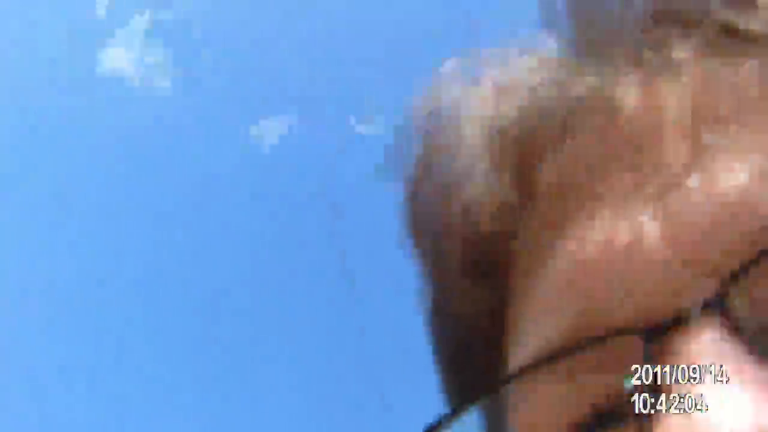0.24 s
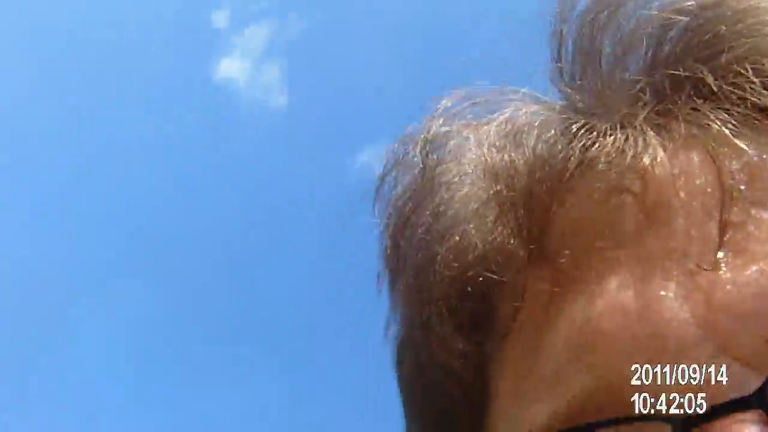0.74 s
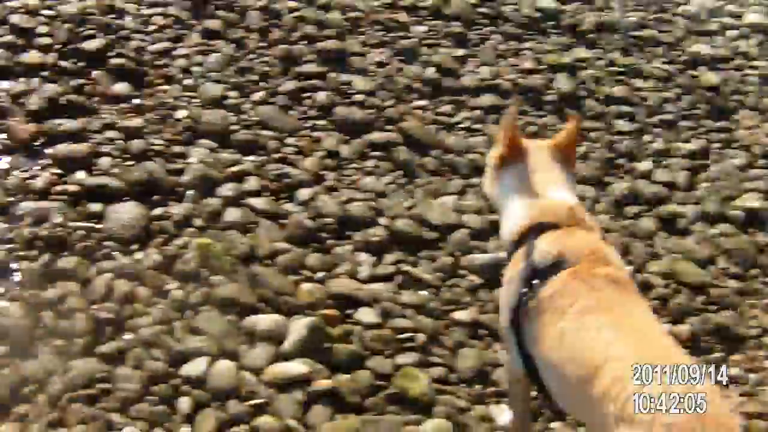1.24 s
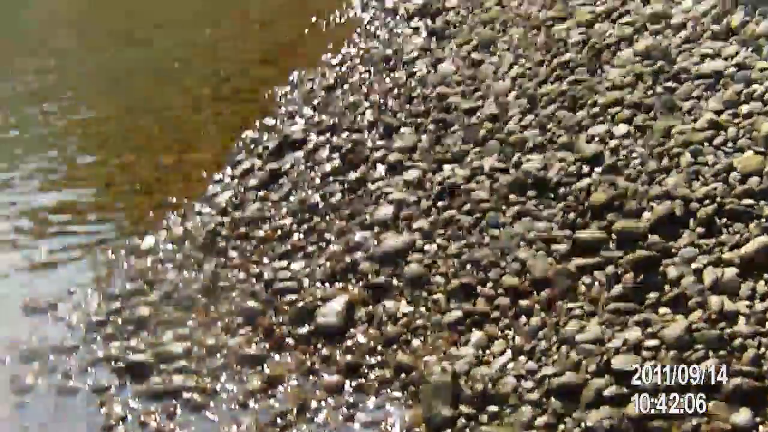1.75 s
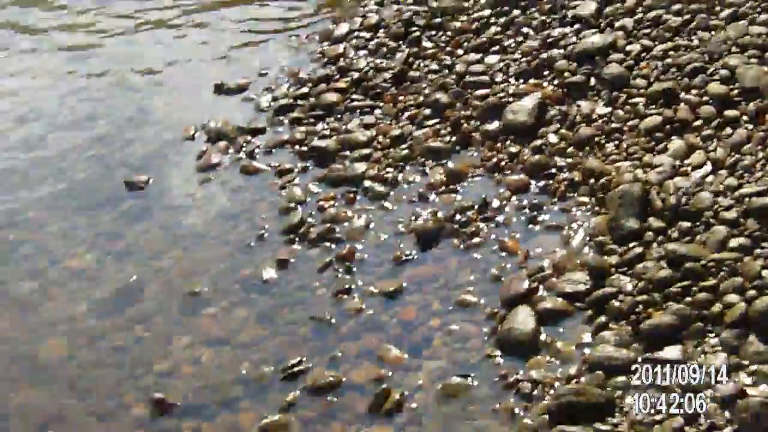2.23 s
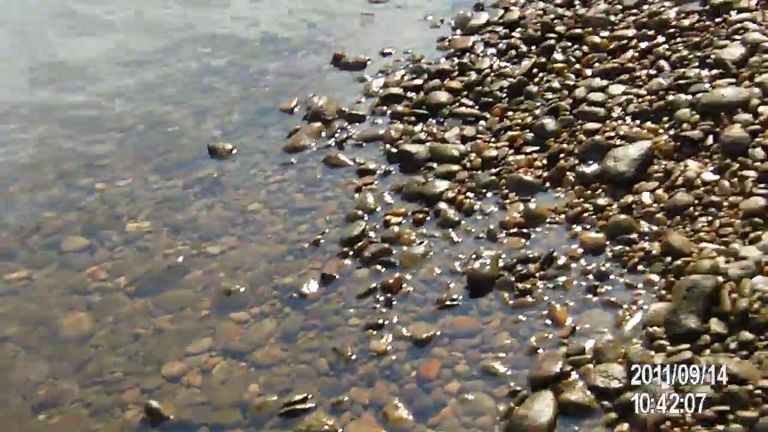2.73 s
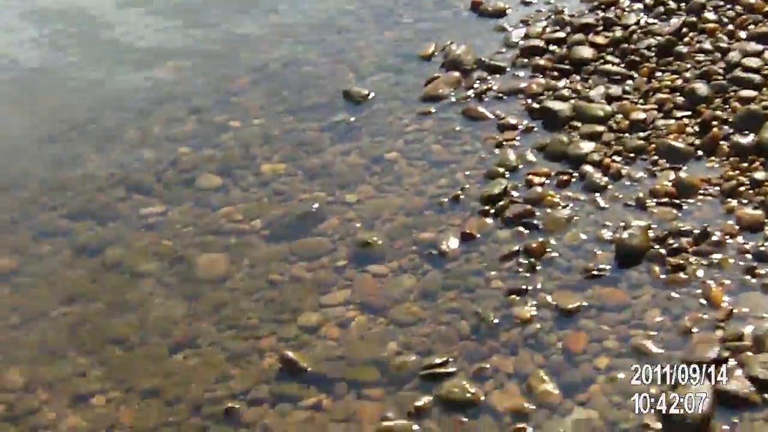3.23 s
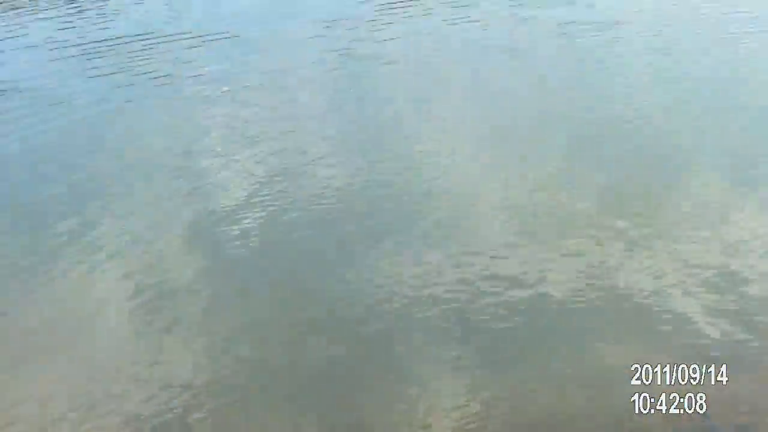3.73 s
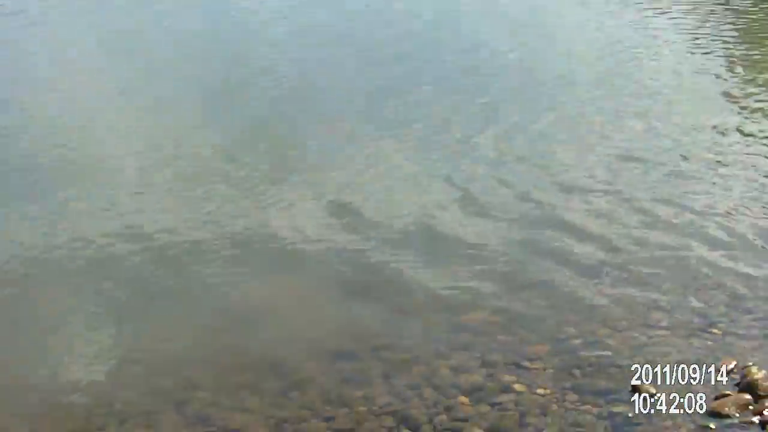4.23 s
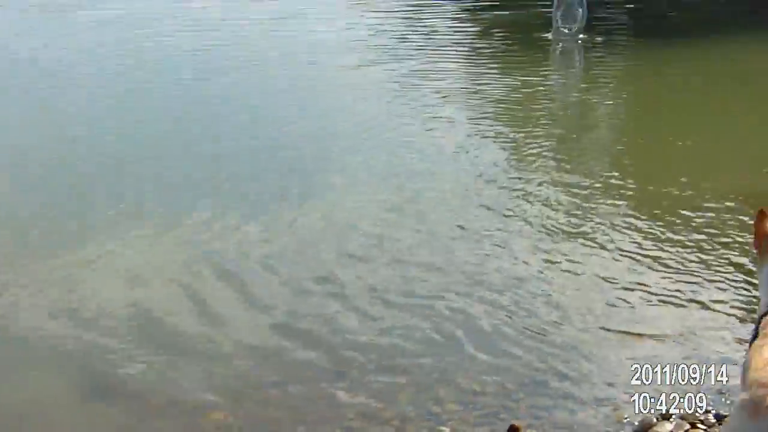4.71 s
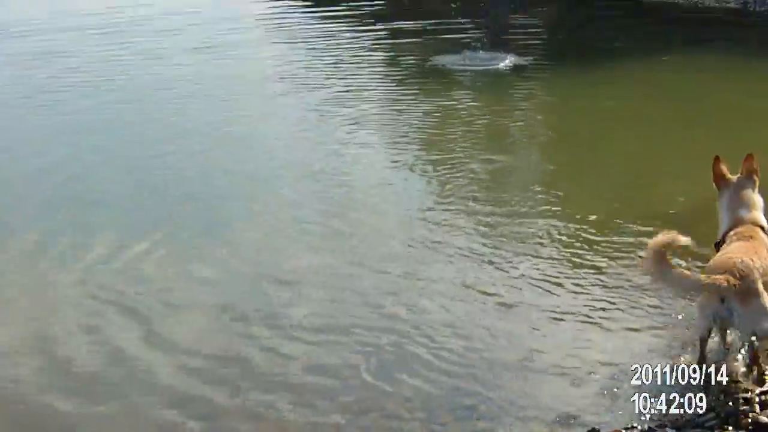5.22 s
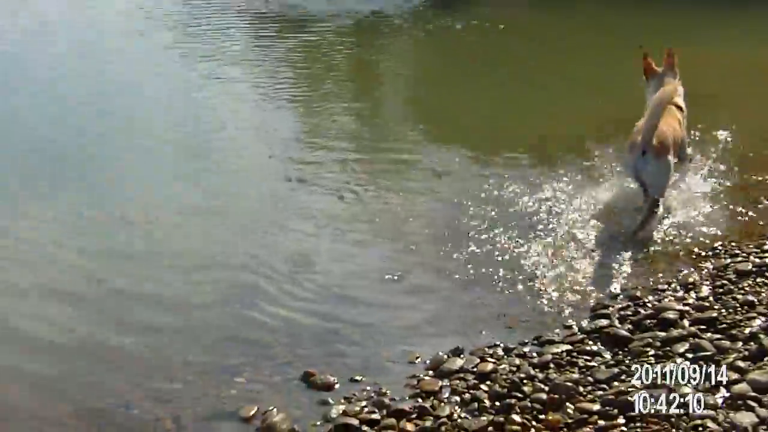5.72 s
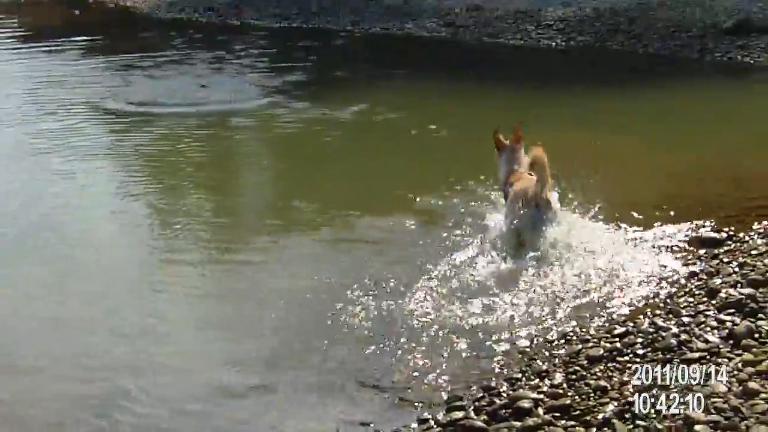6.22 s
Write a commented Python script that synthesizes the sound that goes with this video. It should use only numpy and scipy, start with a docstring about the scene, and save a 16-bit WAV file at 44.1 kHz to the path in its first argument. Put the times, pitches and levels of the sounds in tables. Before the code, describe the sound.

Someone treads over loose river pebbles right beside a hand-held microphone: dense, gritty grinding with sharp clicks and uneven surges. Near the end a thrown stone makes a small, short plop, then a dog plunges through the shallows with quick bursts of spray and bubbly knocks. A faint steady river rush lies behind. Outdoors, dry and close, thin in bass, with the hardest knocks slightly clipped.

```python
"""A dense crackle of grinding river pebbles, close to a hand-held camera: someone treads over loose stones.
The grinding is a swarm of tiny impacts in filtered noise; single knocks are short noise cracks with a faint ring.
A thrown stone plops into the river and a dog splashes after it: short decaying tones, and bursts of spray.
The river is steady band-shaped noise behind; the hardest knocks overload the microphone and are clipped."""
import sys
import numpy as np
from scipy import signal
from scipy.io import wavfile

SR = 44100
rng = np.random.default_rng(int(sys.argv[2]) if len(sys.argv) > 2 else 0)


def wrap_up_sound(samples):
    """Save the sound to the file named by the first command line argument, as 16-bit audio."""
    columns = np.atleast_2d(samples).T
    # keep every value between -1 and 1, then stretch to whole-number steps
    tamed = np.clip(columns, -1, 1)
    steps = np.round(tamed * 32767).astype(np.int16)
    wavfile.write(sys.argv[1], SR, steps)


N = 284886

# A foot loads the pebbles and a patch gives way; levels before the mix gain:
# [t/s, length/s, level/dB, swell over the length/dB, extra bass/dB, extra treble/dB]
SLIDES = [(0.025, 0.185, -21, -1, 6.5, 2.5), (0.235, 0.028, -22.5, 0, 6, 11), (0.3, 0.041, -22, 6, 1, -2),
          (0.476, 0.013, -23.5, -1, 8, 12), (0.79, 0.13, -21.0, -4.5, 7, 2.5),
          (1.015, 0.092, -19.5, 0, 0.5, 5), (1.137, 0.024, -20, -2, -1, 2.0),
          (1.22, 0.085, -23.5, -9.5, -1, 2), (1.335, 0.059, -20.5, 1, -8.5, -3.0),
          (1.435, 0.018, -21.5, -5, -4.0, 9), (1.52, 0.12, -19.0, -3, 3, -2),
          (1.637, 0.1, -15.5, 1.5, 4.5, -7.5), (1.835, 0.071, -23.0, 3, 3, 2.5),
          (2.05, 0.13, -25.5, 0.5, 0.5, 3.5), (2.2, 0.084, -24, -1, 4.5, 2.0),
          (2.275, 0.031, -23.5, 6, 12, -1.0), (2.33, 0.096, -21, -7.5, -3.5, 4.5),
          (2.5, 0.075, -29.5, 1.5, 0, 10.5), (2.68, 0.12, -23.5, -6, 5, -7),
          (2.84, 0.13, -20.5, 7, 1, -3.5), (3.015, 0.12, -24, -10, -6.5, -2),
          (3.255, 0.081, -16.0, 0.5, -5.5, 1.5), (3.49, 0.038, -16.5, 9, -2.5, 0.5),
          (3.55, 0.056, -16.5, -5, -3.5, -4.5), (3.642, 0.022, -13.5, 1.5, -1, -0.5),
          (3.685, 0.1, -24, 3, 1, 1), (3.83, 0.04, -14.5, -3, -4.0, -1), (4.0, 0.037, -23.5, 24, 1, -5),
          (4.18, 0.15, -21.5, 0.5, -2, 0), (4.355, 0.035, -15.0, 11.5, -11, -2),
          (4.505, 0.073, -18.5, 3.5, -4, -4.5), (4.635, 0.11, -21, 9, -8, -7.5),
          (4.85, 0.055, -20, 3.5, -12, 1), (5.03, 0.022, -24.5, 3, -14, 0)]
SLIDE_ATTACK_S, SLIDE_RELEASE_S = 0.0076, 0.0076
# Disturbed stones go on settling between the slides: [t/s, level/dB]
SETTLING = [(0, -31), (.28, -46), (.34, -26), (.54, -32.5), (.65, -26), (.76, -35), (.96, -26.5),
            (1.19, -37.5), (1.3, -26.5), (1.8, -30), (2.02, -36), (2.27, -35.5), (2.47, -33.5),
            (2.81, -29.5), (2.92, -30), (3.0, -31.5), (3.17, -46), (3.25, -25.5), (3.44, -35),
            (4.15, -28.5), (4.45, -26.5), (5.0, -29), (5.2, -64)]
SETTLING_DEPTH_DB, SETTLING_SPARKLE_DB = 4, 0.5
# Colour of the grinding, only its shape counts: [f/Hz, density/(dB per Hz)]
GRAVEL_SPECTRUM = [(71, -73), (120, -48), (360, -22.5), (450, -15.5), (995, -9), (1100, -8), (1790, -0.5),
                   (1990, -1), (2240, -1), (2920, 2), (3170, -1), (6460, -2.5), (11200, -6), (15500, -13)]
# Single knocks at set times, hard and faint, pebble on pebble or a slap on the water;
# levels before the common knock gain:
# [t/s, level over 5 ms/dB, f/Hz, half width/octaves, decay time constant/s]
SET_KNOCKS = [(0.062, -4.5, 5120, 0.73, 0.00096), (0.081, -5.5, 6900, .7, 0.0019),
              (0.1022, -12, 7340, .6, 0.0018), (0.142, -5.5, 6200, 0.48, 0.0025),
              (0.2, -5, 9400, .6, 0.0038), (0.2709, -7, 9900, .4, .0011), (0.3222, -6.5, 7740, 1.1, 0.0017),
              (0.33, -2, 8600, 0.21, 0.0029), (0.4404, -7, 8260, 0.11, .0007),
              (0.4837, -8, 9200, 0.44, 0.00071), (0.525, -4, 6650, 0.16, 0.0016),
              (0.5533, -2.5, 6890, 0.99, 0.0016), (0.5635, -10, 3110, 0.52, 0.0012),
              (0.6378, -15, 6800, 0.19, 0.00056), (0.6957, -16, 3300, 1.2, .0015),
              (0.7194, -3, 5060, 1.2, .0019), (0.736, -9, 4440, 1.5, 0.0012), (1.103, -8, 6600, 2, 0.0013),
              (1.1502, -2.5, 7900, 0.72, 0.0066), (1.217, -8, 10600, .3, 0.0012),
              (1.2692, -8.5, 2120, 0.23, 0.0017), (1.3553, -4.5, 7040, 0.39, 0.00045),
              (1.438, -4.5, 5770, 0.78, 0.0024), (1.52, -7, 3330, 0.39, 0.00087),
              (1.597, -7, 5700, 0.2, 0.0019), (1.6481, -6, 2520, 1.6, 0.0095),
              (1.6812, -6.5, 3020, 1, 0.0039), (1.9876, -14, 7950, 1.8, 0.00086),
              (2.0064, -11.5, 6640, 0.5, 0.0015), (2.048, -2, 6930, 0.57, 0.0013),
              (2.109, -4, 10600, 1.6, .0013), (2.2002, -6.5, 4900, 1.3, 0.0018),
              (2.2168, -1, 8180, 0.21, 0.0013), (2.3073, -6.5, 5660, .5, .0008),
              (2.4853, -6.5, 4000, 0.38, 0.00041), (2.8126, -5, 4500, .25, 0.0015),
              (2.974, -8, 6450, 0.64, 0.0011), (3.0465, -5, 10000, 0.073, 0.00083),
              (3.1206, -12, 5300, 1.2, 0.001), (3.209, -5, 7360, 0.36, 0.0011),
              (3.4108, -9, 4170, 0.82, 0.00055), (3.5981, -9, 6200, .25, 0.00056),
              (3.6531, -12, 3660, 0.5, .0022), (3.6946, -5.5, 3200, 0.56, 0.00078),
              (3.7489, -10, 3500, 0.32, 0.0021), (3.7927, -1, 5600, 0.75, 0.0024),
              (3.925, -4.5, 3800, 0.66, 0.0017), (3.9465, -3.5, 4070, 0.23, 0.001),
              (4.0336, -4, 7900, 1.55, 0.0025), (4.042, -0.5, 3790, 0.27, 0.0021),
              (4.0706, -8.5, 4740, 0.89, 0.00086), (4.1063, -11.5, 4400, 0.35, 0.0028),
              (4.1324, -10.5, 4160, .5, 0.00072), (4.3011, -6.5, 3550, .5, .0013),
              (4.3458, -9.5, 3200, .1, .005), (4.3859, -3, 6240, 0.79, 0.0029),
              (4.5198, -4.5, 7700, 1.2, .0028), (4.5793, -2.5, 10600, 0.64, 0.0018),
              (4.637, -6.5, 4120, .22, 0.006), (4.6831, -5, 3630, 0.47, 0.0016),
              (4.7957, -13.5, 2500, 1.35, 0.002), (4.8742, -6, 4470, 1.53, 0.0016),
              (4.8857, -7, 2800, 0.37, 0.0015), (4.9634, -14, 6000, 0.43, 0.00075),
              (4.9805, -5.5, 7400, 0.93, 0.00055), (5.0109, -11, 2840, 0.12, 0.0028),
              (5.0212, -10, 3260, .6, 0.00051), (5.041, -5.5, 10400, 0.36, 0.00085),
              (5.0517, -8.5, 9800, 0.42, 0.00074), (5.1313, -10.5, 9200, 0.43, 0.0014),
              (5.2225, -9.5, 9300, 0.65, 0.0015), (5.2287, -9, 8950, 0.9, .0016),
              (5.2757, -6.5, 3000, 1.26, 0.0036), (5.3005, -9, 5800, 1.3, .0012),
              (5.5616, -9, 3360, 0.55, 0.0022), (5.5843, -8, 2340, 0.14, 0.0027)]
RESONANCE_Q, RESONANCE_DB = 9, 8
# Lesser knocks come at a steady rate with jittered times; their level follows the grinding;
# levels before the common knock gain
KNOCKS_PER_S, KNOCK_OVER_DB, KNOCK_SPREAD_DB = 24, 8.5, 2.5
KNOCK_FOLLOWS, TYPICAL_GRIND_DB = 0.72, -23  # share of the grinding's swing about its typical level
KNOCK_TOP_DB = -12
KNOCK_HZ, KNOCK_SPREAD_OCT, KNOCK_WIDTH_OCT, KNOCK_DECAY_S = 6200, 0.554, 0.51, 0.00092
# Upper limits of ping level above the grinding and churning level curves
CLINK_OVER_DB, BUBBLE_OVER_DB = 8.5, 1.5
# How far the camera points up: [t/s, share 0-1]
UPTURN = [(0, 0.4), (.25, 1), (1.0, 0.5), (1.25, 0)]
# Microphone colour while the camera points up, away from the ground: [f/Hz, width/Hz, level/dB]
UPTURNED_PEAKS = [(430, 100, -2), (1840, 90, 1.5), (3230, 140, -4), (3800, 370, 4), (5530, 900, -2),
                  (6540, 330, 3), (7500, 470, 6), (8480, 400, 5.5), (14800, 4600, -4.5)]
# The river's steady rush, only its shape counts: [f/Hz, density/(dB per Hz)]
RIVER_SPECTRUM = [(30, 3), (70, 1), (130, -15.5), (230, -6), (350, -3), (800, 2.5), (2500, 1), (7000, -6.5),
                  (15000, -2)]
# Short decaying tones: a wet stone knocking at 1.99 s, then air pockets ringing in the water,
# the thrown stone landing at 4.79 s; levels before the plop gain:
# [t/s, level/dB, f/Hz, time to fall 60 dB/s]
WET_TONES = [(1.992, -7, 1004, 0.019), (4.794, -9.5, 810, 0.047), (4.794, -17.5, 285, 0.037),
             (4.824, -14.5, 880, 0.037), (5.088, -19, 885, .04), (5.225, -9.5, 875, 0.021),
             (5.335, -27, 540, .05), (5.378, -2.5, 860, 0.012), (5.618, -31, 383, .2),
             (5.635, -8, 850, 0.026), (5.823, -9.5, 896, 0.05), (5.824, -30, 490, 0.15),
             (5.893, -1, 840, 0.023), (5.922, -15, 810, 0.021), (6.124, -25.5, 378, .075),
             (6.188, -5, 950, 0.031), (6.191, -18.5, 400, 0.029), (6.285, -35, 230, 0.042),
             (6.302, -28, 415, 0.092)]
# The dog's legs plunge into the shallows; levels before the mix gain and the resonances:
# [t/s, length/s, level/dB, swell over the length/dB, extra bass/dB, extra treble/dB]
SPLASHES = [(5.088, 0.07, -18.5, -4, -4, -2.5), (5.24, 0.043, -21, 12, -5, -3),
            (5.325, 0.063, -24.5, 2, 4.5, -0.5), (5.48, 0.053, -26.5, 2, -9, -2),
            (5.56, 0.078, -21, 3, -5.5, -1), (5.8, 0.1, -30.5, -3, 10, -5),
            (5.885, 0.041, -22.5, 0, 4, 2.5), (6.07, 0.13, -24, 4, 2.5, 0.5),
            (6.29, 0.27, -30, 1, 16, -5.5)]
SPLASH_ATTACK_S, SPLASH_RELEASE_S = 0.013, 0.018
# Once the dog is in, thrown-up water keeps falling back
WADE_START_S, WADE_BUILD_S = 5.12, 0.031
FALLBACK_DB, FALLBACK_DEPTH_DB, FALLBACK_SPARKLE_DB = -28, -7.5, 3.5
# Colour of the splashing, only its shape counts: [f/Hz, density/(dB per Hz)]
WATER_SPECTRUM = [(71, -73), (120, -42), (282, -35), (383, -14.5), (575, -22), (676, -4), (917, -3.5),
                  (1650, -2), (2290, -4), (3810, -7.5), (5270, -7), (7610, -16.5), (9910, -0.5),
                  (14000, -16), (15500, -15)]
# Resonances and hollows of the splashing: [f/Hz, width/Hz, level/dB]
SPLASH_PEAKS = [(890, 200, 3), (1620, 180, -3.5), (2240, 540, 4.5), (3300, 130, 2.5), (6380, 390, 3.5),
                (9100, 2800, 1.5), (11700, 2100, -6), (14600, 1700, 5.5)]
# Likeness of the two microphone ports: [f/Hz, correlation 0-1]
LIKENESS = [(60, .7), (300, .94), (700, .96), (3000, .94), (5000, .86), (8000, .68), (14000, .35)]
# Balance of the two ports, left over right: [f/Hz, level/dB]
BALANCE = [(60, 1), (200, 9.5), (400, 7.3), (700, 7), (1300, 4.5), (2400, 1), (8000, 0.5), (15000, 0)]
# Microphone: bass loss before and after it overloads, treble notch, top limit, delay of the left port
BASS_CUT_HZ, COUPLING_HZ = 306, 70
NOTCH_HZ, NOTCH_WIDTH_HZ, NOTCH_DB = 7850, 99, -18.5
CUTOFF_HZ, PORT_LAG_S = 15900, 6.5e-6
# Band edges of the crackle [f/Hz]
EDGES = np.geomspace(122, 16000, 21)


def from_db(db):
    """Logarithmic level: decibels to amplitude gain."""
    return np.exp(np.asarray(db) * (np.log(10) / 20))


def rms_one(x):
    """Normalisation: scale to a root mean square of 1."""
    return x / np.sqrt(np.mean(x ** 2) + 1e-20)


def in_time(rows):
    """Linear interpolation: each column of a curve, sample by sample."""
    s, *columns = np.transpose(rows)
    return [np.interp(np.arange(N) / SR, s, c) for c in columns]


def at_hz(points, hz):
    """Logarithmic pitch scale: read a spectrum on a log-frequency axis."""
    points = np.array(points)
    return np.interp(np.log(hz), np.log(points[:, 0]), points[:, 1])


def band(x, low, high, order=2):
    """Band-limiting: Butterworth band-pass."""
    limits = [max(low, 10), min(high, .45 * SR)]
    return signal.sosfilt(signal.butter(order, limits, "band", fs=SR, output="sos"), x + 1e-18)


def drift(rate):
    """Random modulation: joined Gaussian values, about `rate` a second, scaled to rms 1."""
    step = min(rate / SR, 1 / 20)
    values = rng.standard_normal(N // 20 + 2)
    return rms_one(np.interp(np.arange(N) * step, np.arange(N // 20 + 2), values))


def stereo(mid, side, hz, pan_db):
    """Interchannel coherence: the likeness of the two ports depends on frequency."""
    alike = np.clip(at_hz(LIKENESS, hz), 0, .99)
    sides = np.array([[1], [-1]])
    common = np.sqrt((1 + alike) / 2) * mid
    opposed = np.sqrt((1 - alike) / 2) * side * sides
    return (common + opposed) * from_db(sides * pan_db / 2)


def add(out, s, sound):
    """Superposition: mix a short stereo sound in at time s."""
    i = max(round(s * SR), 0)
    out[:, i:i + sound.shape[1]] += sound[:, :N - i]


def coloured(x, peaks):
    """Resonance: a chain of second-order peaks and hollows."""
    for hz, width_hz, db in peaks:
        w, a = 2 * np.pi * hz / SR, from_db(db / 2)
        k = np.tan(np.pi * width_hz / SR)
        zeros = [1 + k * a, -2 * np.cos(w), 1 - k * a]
        poles = [1 + k / a, -2 * np.cos(w), 1 - k / a]
        x = signal.lfilter(zeros, poles, x + 1e-18)
    return x


def bursts(rows, attack_s, release_s, bed_db, bed_depth_db, bed_sparkle_db):
    """Power addition: bursts over a quiet bed; gives level and power-weighted depth and sparkle, all in dB."""
    t = np.arange(N) / SR
    power = from_db(bed_db) ** 2 + 1e-14
    depth, sparkle = power * bed_depth_db, power * bed_sparkle_db
    for s, length, level_db, swell_db, depth_db, sparkle_db in rows:
        near = slice(max(int(s * SR) - SR // 5, 0), int((s + length) * SR) + SR // 3)
        age = t[near] - s
        # exponential rise before the burst and fall after it
        edges = np.exp(np.minimum(age, 0) / attack_s - np.maximum(age - length, 0) / release_s)
        swell = swell_db * (np.clip(age / length, 0, 1) - .5)
        burst = (edges * from_db(level_db + swell)) ** 2
        power[near] += burst
        depth[near] += burst * depth_db
        sparkle[near] += burst * sparkle_db
    return 10 * np.log10(power), depth / power, sparkle / power


def crackle(motion, spectrum, per_s, size_db, clump_db, clump_rate, width_oct, hiss, patchy_db, scatter_s):
    """Shot noise: tiny impacts, each of its own size and pitch, over the hiss of countless smaller ones."""
    level_db, depth_db, sparkle_db = motion
    centres = np.sqrt(EDGES[1:] * EDGES[:-1])
    shares = from_db(at_hz(spectrum, centres)) * np.sqrt(np.diff(EDGES))
    shares /= np.linalg.norm(shares)
    # impacts swell together in little avalanches
    surge = rms_one(from_db(clump_db * np.clip(drift(clump_rate), -2, 2)))
    at = np.flatnonzero(rng.random(N) < per_s / SR)
    size = from_db(size_db * np.minimum(rng.exponential(1, N)[at], 3))
    pitch = np.log2(rng.uniform(np.sqrt(150), np.sqrt(15000), N)[at] ** 2)  # octaves
    out, noises = np.zeros((2, N)), rng.standard_normal((3, 2, N))
    for k, (low, high, hz, share) in enumerate(zip(EDGES, EDGES[1:], centres, shares)):
        reach = size / (1 + ((np.log2(hz) - pitch) / width_oct) ** 2)
        touches = np.zeros(N)
        touches[at] = reach ** 2
        # each impact is scattered for a moment between the surfaces around it
        power = signal.lfilter([1], [1, -np.exp(-1 / (scatter_s * SR))], touches + 1e-12)
        envelope = np.sqrt(power / power.mean() + hiss ** 2)
        mid, side = band(noises[k % len(noises)] * envelope, low, high)
        deep = np.clip(np.log2(2400 / hz), 0, 1)
        bright = np.clip(np.log2(hz / 4800), 0, 1)
        gain = share * from_db(deep * depth_db + bright * sparkle_db + patchy_db * drift(45))
        out += gain * stereo(rms_one(mid), rms_one(side), hz, at_hz(BALANCE, hz))
    return out * surge * from_db(level_db)


def pings(level_db, start_s, end_s, low_hz, high_hz, cycles, rise, gain_db, spread_db, count):
    """Damped oscillation: brief tones at random pitches follow a level, as clinking stones or rising bubbles."""
    out, t = np.zeros((2, N)), np.arange(SR // 25) / SR
    for k, (when, size, strength, place) in enumerate(rng.random((count, 4))):
        s = np.interp(k + when, [0, count], [start_s, end_s])
        hz = low_hz * (high_hz / low_hz) ** size
        age = t * hz / cycles  # 1 when the tone has fallen by 60 dB
        wave = np.sin(2 * np.pi * hz * t * (1 + rise * np.minimum(age, 2)))
        tone = wave * from_db(-60 * age) * (1 - np.exp(-t * hz))
        pan_db = at_hz(BALANCE, hz) + 6 * (place - .5)
        peak_db = level_db[np.clip(int(s * SR), 0, N - 1)] + gain_db - spread_db * strength
        add(out, s, tone * from_db(peak_db + np.array([[pan_db], [-pan_db]]) / 2))
    return out


def lesser_knocks(grind_db):
    """Level-following excitation: knock rows at a steady, jittered rate, harder when the grinding is harder."""
    rows = []
    for k in range(int(KNOCKS_PER_S * WADE_START_S)):
        late, strength, pitch, width, decay = np.clip(rng.standard_normal(5), -2, 2)
        s = abs(k + late / 2) / KNOCKS_PER_S
        swing_db = grind_db[min(int(s * SR), N - 1)] - TYPICAL_GRIND_DB
        level_db = TYPICAL_GRIND_DB + KNOCK_FOLLOWS * swing_db + KNOCK_OVER_DB + KNOCK_SPREAD_DB * strength
        hz = min(KNOCK_HZ * 2 ** (KNOCK_SPREAD_OCT * pitch), 12000)
        half_width = KNOCK_WIDTH_OCT * 2 ** (width / 2)
        rows.append((s, min(level_db, KNOCK_TOP_DB), hz, half_width, KNOCK_DECAY_S * 2 ** (decay / 2)))
    return rows


def clacks(rows, ring_db, scatter_db, scatter_s, bounce_db, fade_in, gain_db, pan_spread_db):
    """Impact and scattering: a short fade-in, a crack, one bounce, a faint ring at the knock's pitch, a tail."""
    out, t = np.zeros((2, N)), np.arange(-SR // 200, SR // 25) / SR
    after = np.maximum(t, 0)
    stone_range = signal.butter(2, [790, 15500], "band", fs=SR, output="sos")
    for s, level_db, hz, width, decay in rows:
        pan_db = at_hz(BALANCE, hz) + pan_spread_db * rng.standard_normal()
        width, decay = np.clip(width, .1, 1.6), max(decay, .0003)
        lag, white = rng.uniform(1, 3.2) * decay, rng.standard_normal((2, len(t)))
        # each knock fades in briefly, in proportion to its decay
        onset = np.exp(np.minimum(t, 0) / (fade_in * decay))
        bounce = from_db(bounce_db) * (t > lag) * np.exp(-abs(t - lag) / decay)
        contact = np.exp(-after / decay) + bounce
        scatter = from_db(scatter_db) * np.exp(-after / scatter_s)
        crack = band(white * onset * (contact + scatter), hz / 2 ** width, hz * 2 ** width, order=1)
        ring = np.sin(2 * np.pi * hz * after) * np.exp(-after / decay)
        # three random resonances vary each knock's colour
        resonant_hz = np.minimum(hz * 2 ** rng.uniform(-.4 - width, .4 + width, size=3), 14000)
        resonances = [(f, f / RESONANCE_Q, RESONANCE_DB) for f in resonant_hz]
        mid, side = coloured(signal.sosfilt(stone_range, crack), resonances)
        rung = rms_one(mid) + from_db(ring_db) / width * rms_one(ring)
        knock = stereo(rung, rms_one(side), hz, pan_db)
        # the level holds the knock's whole energy as if spread over 5 ms
        add(out, s + t[0], from_db(level_db + gain_db) * rms_one(knock) * np.sqrt(.005 * SR / len(t)))
    return out


def pebbles():
    """Granular friction: grinding, clinks and knocks underfoot, coloured while the camera points up."""
    settling_db = in_time(SETTLING)[0]
    grind = bursts(SLIDES, SLIDE_ATTACK_S, SLIDE_RELEASE_S, settling_db, SETTLING_DEPTH_DB, SETTLING_SPARKLE_DB)
    gravel = crackle(grind, GRAVEL_SPECTRUM, per_s=1100, size_db=3.0, clump_db=1.5, clump_rate=160,
                     width_oct=0.81, hiss=0.51, patchy_db=1.56, scatter_s=0.0013)
    clinks = pings(grind[0], 0, WADE_START_S, low_hz=2200, high_hz=11500, cycles=55, rise=0,
                   gain_db=CLINK_OVER_DB, spread_db=16, count=420)
    knocks = clacks(list(SET_KNOCKS) + lesser_knocks(grind[0]), ring_db=-35.5, scatter_db=-28.5,
                    scatter_s=0.012, bounce_db=-6.0, fade_in=0.5, gain_db=-5.0, pan_spread_db=3.0)
    stones = from_db(-1.65) * gravel + clinks + knocks
    upturn = np.clip(in_time(UPTURN)[0], 0, 1)
    return upturn * coloured(stones, UPTURNED_PEAKS) + (1 - upturn) * stones


def river(level_db):
    """Stationary broadband noise: smooth, distant running water, shaped band by band."""
    out, edges = 0, np.geomspace(20, 16000, 11)
    for low, high in zip(edges, edges[1:]):
        hz = np.sqrt(low * high)
        mid, side = band(rng.standard_normal((2, N)), low, high, order=3)
        out = out + from_db(at_hz(RIVER_SPECTRUM, hz)) * stereo(mid, side, hz, at_hz(BALANCE, hz))
    return from_db(level_db) * rms_one(out)


def plops(rise, swell_s, pan_db, gain_db):
    """Damped resonance: a wet knock, then air pockets; each tone swells, decays and rises a little in pitch."""
    out, t = np.zeros((2, N)), np.arange(SR // 5) / SR
    for s, peak_db, hz, t60 in WET_TONES:
        tone = np.sin(2 * np.pi * hz * t * (1 + rise * t / t60)) * (1 - np.exp(-t / swell_s))
        decaying = tone * from_db(peak_db + gain_db - 60 * t / t60)
        add(out, s, decaying * from_db([[pan_db / 2], [-pan_db / 2]]))
    return out


def wading():
    """Spray and entrained air: each plunge throws drops and leaves bubbles; water patters back between."""
    before_start = np.minimum(np.arange(N) / SR - WADE_START_S, 0)
    # exponential build-up to the steady patter, as dB
    fallback_db = FALLBACK_DB + 20 * np.log10(np.e) * before_start / WADE_BUILD_S
    churn = bursts(SPLASHES, SPLASH_ATTACK_S, SPLASH_RELEASE_S,
                   fallback_db, FALLBACK_DEPTH_DB, FALLBACK_SPARKLE_DB)
    spray = crackle(churn, WATER_SPECTRUM, per_s=670, size_db=3.5, clump_db=1.5, clump_rate=120,
                    width_oct=1.0, hiss=0.94, patchy_db=2.0, scatter_s=0.00096)
    bubbles = pings(churn[0], WADE_START_S, N / SR, low_hz=900, high_hz=6000, cycles=45, rise=.06,
                    gain_db=BUBBLE_OVER_DB, spread_db=16, count=260)
    return coloured(from_db(-1.0) * spray + bubbles, SPLASH_PEAKS)


def thinned(x, hz):
    """First-order high-pass: a gentle bass cut."""
    return signal.sosfilt(signal.butter(1, hz, "high", fs=SR, output="sos"), x)


def scene():
    """Superposition: stones, the dog, the plops and the river behind them."""
    stones_and_dog = pebbles() + wading()
    return stones_and_dog + plops(rise=0.025, swell_s=0.0018, pan_db=8.0, gain_db=-4) + river(level_db=-43.5)


def record(dry):
    """Overload: the microphone thins the bass, clips, notches the treble and cuts the top; its left port lags."""
    top = .92
    # an all-pass filter delays the left port by a fraction of a sample
    slip = (1 - PORT_LAG_S * SR) / (1 + PORT_LAG_S * SR)
    ports = np.array([signal.lfilter([slip, 1], [1, slip], dry[0]), dry[1]])
    clipped = np.clip(thinned(ports, BASS_CUT_HZ), -top, top)
    notched = coloured(thinned(clipped, COUPLING_HZ), [(NOTCH_HZ, NOTCH_WIDTH_HZ, NOTCH_DB)])
    return signal.sosfilt(signal.cheby2(16, 60, CUTOFF_HZ, fs=SR, output="sos"), notched)


dry = scene()
out = record(dry)
wrap_up_sound(out)
```